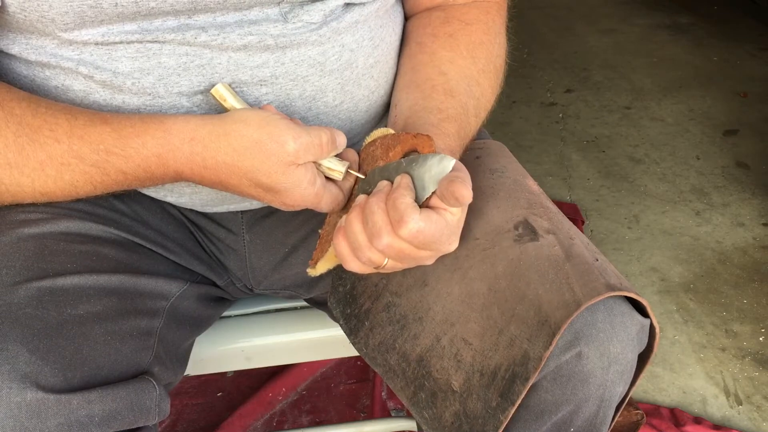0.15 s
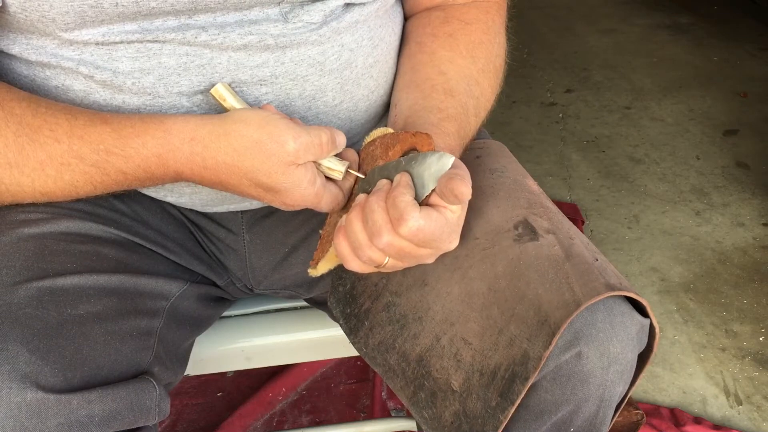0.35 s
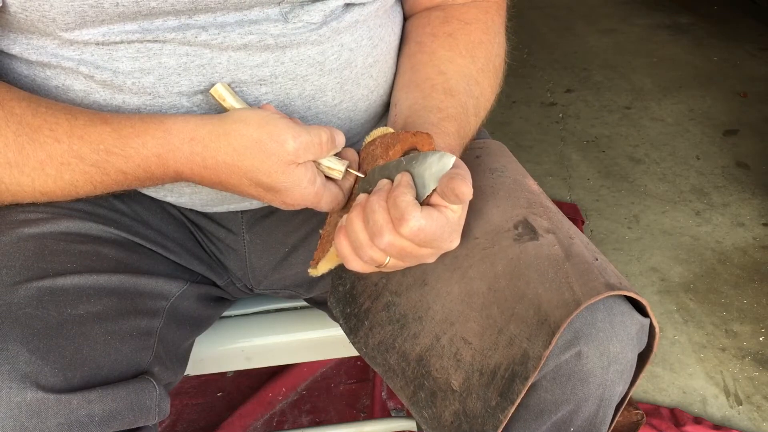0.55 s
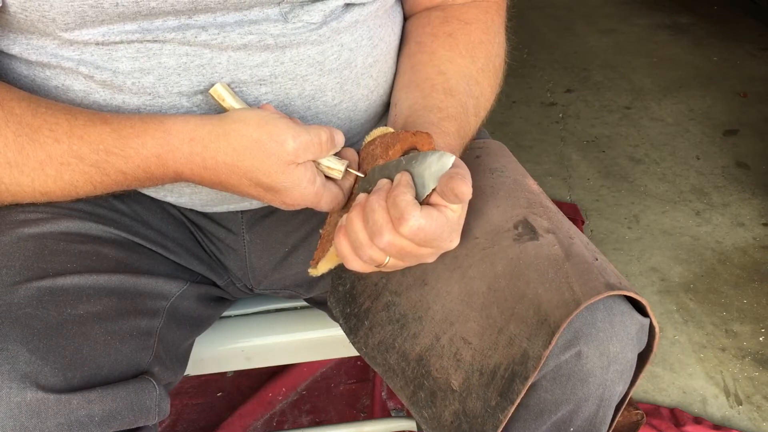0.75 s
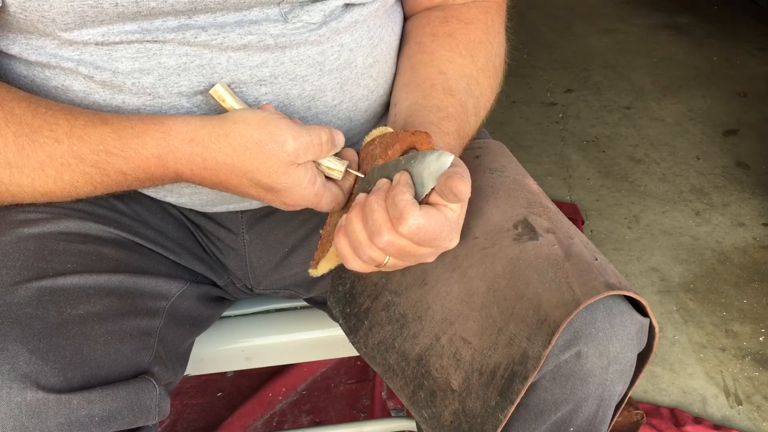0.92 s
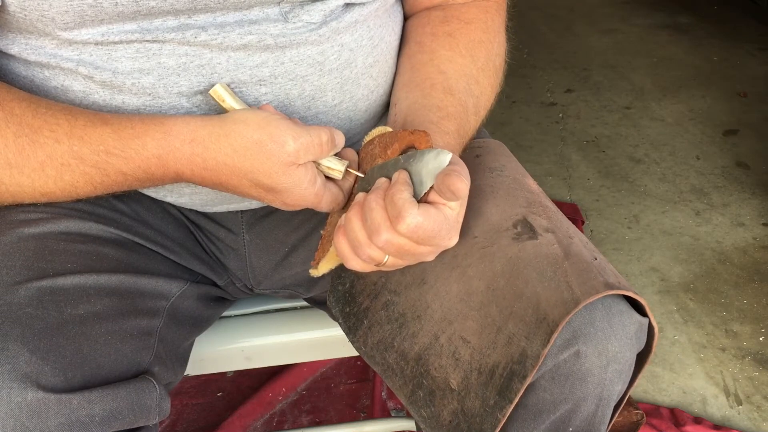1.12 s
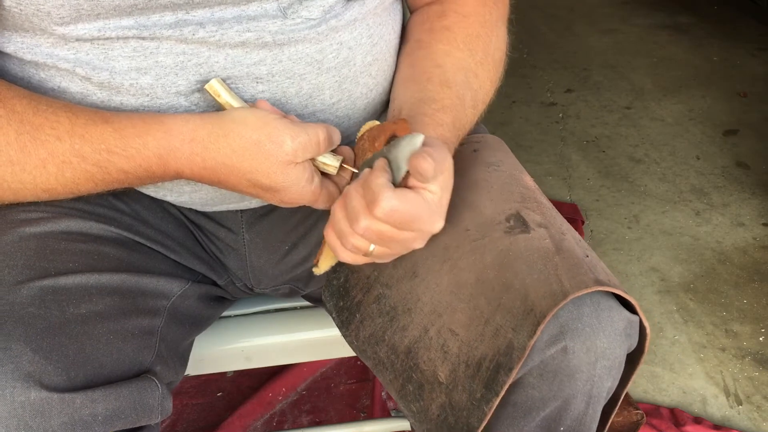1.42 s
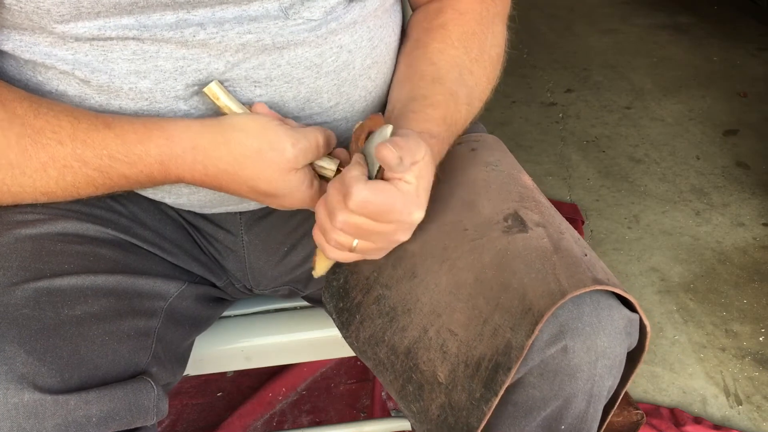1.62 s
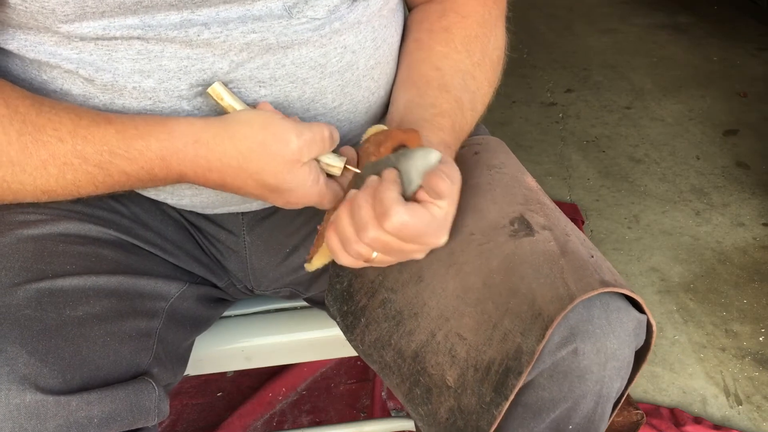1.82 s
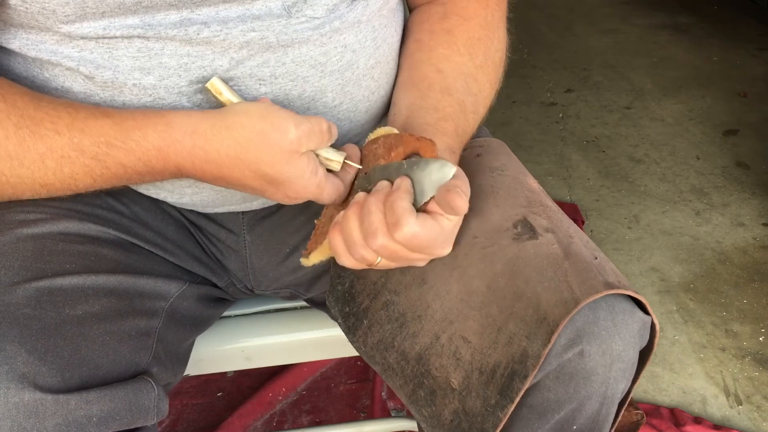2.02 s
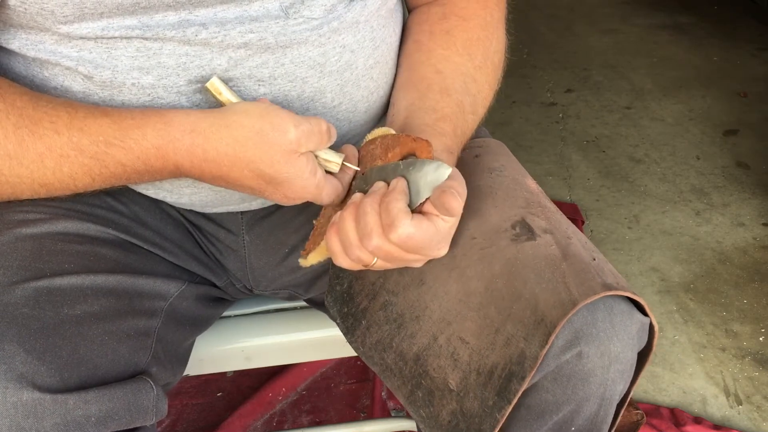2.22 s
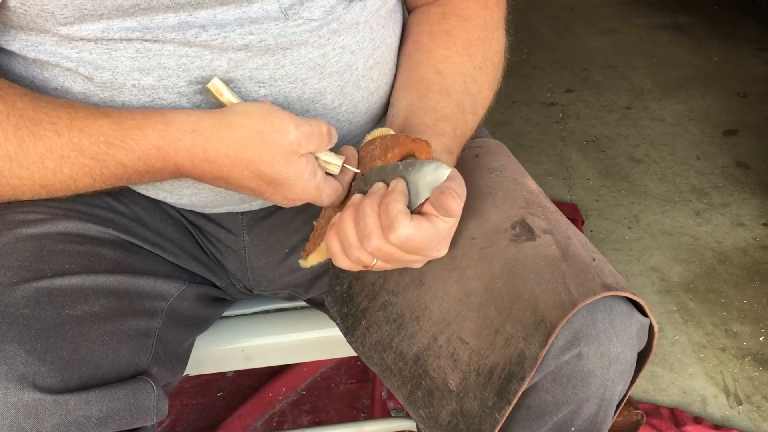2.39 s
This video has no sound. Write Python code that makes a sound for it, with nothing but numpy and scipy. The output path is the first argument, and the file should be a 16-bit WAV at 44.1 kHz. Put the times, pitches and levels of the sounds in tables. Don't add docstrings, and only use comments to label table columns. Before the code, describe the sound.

Close-up stone flaking on a leather pad, starting with small sparse clicks, building to loud snaps and a quick crackling cluster, then only soft room air and a faint low motor hum remain, mono.

```python
import sys
import numpy as np
from scipy import signal
from scipy.fft import rfft, irfft, next_fast_len
from scipy.io import wavfile
from scipy.ndimage import uniform_filter1d, map_coordinates

SR = 44100
rng = np.random.default_rng(int(sys.argv[2]) if len(sys.argv) > 2 else 0)


def transcribe(u):
    v = np.clip(np.atleast_2d(u).T, -1, 1)
    q = np.round(v * 32767).astype(np.int16)
    wavfile.write(sys.argv[1], SR, q)


def gain_from_decibels(decibels):
    exponent = np.asarray(decibels, float) / 20
    return 10 ** exponent


N = 112455


def unit(x):
    return x / np.sqrt(np.mean(x ** 2) + 1e-20)


def along(points, hz):
    f, v = np.transpose(points)
    return np.interp(np.log(hz + 1), np.log(f + 1), v)


def wobble(rate):
    knots = rng.standard_normal(400)
    return map_coordinates(knots, [np.arange(N) * rate / SR])


def filtered(x, response):
    m = next_fast_len(2 * len(x))
    hz = np.fft.rfftfreq(m, 1 / SR)
    return irfft(rfft(x, m) * response(hz), m)[:len(x)]


def add(track, x, s):
    track[round(s * SR):][:len(x)] += x


# f/Hz, density/dB per Hz
RUMBLE = [(20, -13), (35, -6), (70, 4.5), (150, -3), (220, -2.5), (320, -28.5), (600, -76)]
# f/Hz, density/dB per Hz
AIR = [(150, -16), (260, 2.5), (400, 1.5), (1100, -1), (2200, -10), (4840, -21.5), (10200, -31),
       (15300, -33.5)]


def air():
    def noise(points):
        response = lambda f: gain_from_decibels(along(points, f)) * (f < 15750)
        return unit(filtered(rng.standard_normal(N), response))

    rumble_db = -49 + 0.77 * wobble(7.0)
    wash_db = -52 + 0.18 * wobble(0.39) + 0.26 * wobble(10.9)
    return gain_from_decibels(rumble_db) * noise(RUMBLE) + gain_from_decibels(wash_db) * noise(AIR)


# t/s, f/Hz
IDLE = [(0, 73.87), (.5, 72.54), (.9, 74.3), (1.3, 73.78), (1.701, 74.88), (2.1, 73.8), (2.55, 72.96)]
# multiple of the slow beat, level/dB
ORDER = [(7, -59), (8, -49), (11, -43), (13, -54), (14, -61.5), (16, -45.5), (17, -51.5), (19, -58.5),
         (21, -51.5), (30, -59), (31, -64), (32, -55), (38, -62.5), (47, -68)]


def engine():
    def tone(phase, db):
        level = np.sqrt(2) * gain_from_decibels(db + 3.5 * wobble(3))
        drift = 0.22 * wobble(2.19)
        return level * np.sin(phase + 2 * np.pi * rng.random() + drift)

    s, hz = np.transpose(IDLE)
    t = np.arange(N) / SR
    firing_hz = np.interp(t, s, hz)
    beat = 2 * np.pi * np.cumsum(firing_hz) / SR / 16
    orders = sum(tone(round(k) * beat, db) for k, db in ORDER)
    fan = tone(2 * np.pi * 124.7 * t, -53.5)
    return orders + fan


# f/Hz, t60/s
ROOM = [(300, 0.42), (2000, 0.39), (6000, 0.25), (10000, 0.22), (15000, 0.14)]


def room(x):
    gap_s, tail_db = 0.0035, -16.5
    hz, t, z = signal.stft(rng.standard_normal(SR // 4), SR, nperseg=128)
    decay = gain_from_decibels(-60 * t / along(ROOM, hz)[:, None])
    tail = signal.istft(z * decay, SR, nperseg=128)[1]
    late = np.pad(tail / np.linalg.norm(tail), (round(gap_s * SR), 0))
    direct = np.pad(x, (0, len(late) - 1))
    return direct + gain_from_decibels(tail_db) * signal.fftconvolve(x, late)


def body(modes, scatter_db):
    def response(f):
        total = 0
        for k, ((centre, width, db), extra_db) in enumerate(zip(modes, scatter_db)):
            damping = 1j * f * width
            mode = damping / (centre ** 2 - f ** 2 + damping)
            total = total + (-1) ** k * gain_from_decibels(db + extra_db) * mode
        return total
    return response


def fractures(size, spread_db):
    return rng.standard_normal(size) * gain_from_decibels(spread_db * rng.exponential(size=size))


# f/Hz, width/Hz, level/dB
STONE = [(4550, 300, -6.5), (5450, 500, -7), (6220, 460, -2)]
# f/Hz, width/Hz, level/dB
PAD = [(1130, 350, -5), (1640, 260, -1), (2300, 360, -1), (3270, 200, -2)]
# f/Hz, width/Hz, level/dB
EDGE = [(7900, 600, -11.5), (9100, 600, -3), (9920, 400, -5.5), (11000, 570, -1.5), (12800, 700, -8.5),
        (13700, 600, -8.5), (15200, 1400, -6)]


def struck(force, pad_db, edge_db):
    soften_hz = 11800
    soft = filtered(force, lambda f: 1 / (1 + 1j * f / soften_hz) ** 3)
    scatter_db = 1.8 * rng.standard_normal((3, 7))
    parts = zip((STONE, PAD, EDGE), (0, pad_db, edge_db), scatter_db)
    return sum(gain_from_decibels(db) * unit(filtered(soft, body(modes, scatter))) for modes, db, scatter in parts)


GRIT_STARTS = [1.127, 1.381, 1.565, 1.612, 1.730, 1.761, 1.790, 1.824, 1.849]
# fade/ms, level/dB, pad share/dB, edge share/dB
GRIT = [
    (13, -54, 4.5, -7),
    (30, -41, 0.5, -11.5),
    (19, -42, 7.5, -5),
    (15, -57, 5.5, -7),
    (15, -52, 8, -9),
    (12, -48, -7, -5),
    (9.7, -41, -0.5, -8),
    (19, -43.5, 1, -9),
    (15.1, -47.5, 1, -9.5),
]


def grit():
    out, t = np.zeros(N + SR), np.arange(SR // 8) / SR
    grains_per_s = 5500
    for s, (ms, db, pad_db, edge_db) in zip(GRIT_STARTS, GRIT):
        hits = rng.random(len(t)) < grains_per_s / SR
        grains = fractures(len(t), 1.8) * hits
        fade = np.clip(t / 0.002, 0, 1) * np.exp(-(1000 * t / ms) ** 1.5)
        add(out, room(gain_from_decibels(db) * fade * struck(grains, pad_db, edge_db)), s)
    return out[:N]


# f/Hz, width/Hz, level/dB
HAND = [(408.3, 270, 6), (1043, 320, -3.5), (1702, 230, -1)]
# t/s, peak level/dB, finger share/dB, pad ring share/dB
THUMPS = [
    (1.3772, -27, -2, -15),
    (1.5612, -21.5, 0.5, -4.5),
]


def thumps():
    out, t = np.zeros(N + SR), np.arange(SR // 20) / SR
    push = np.exp(-((t - 0.0008) / 0.00015) ** 2)
    for s, db, finger_db, pad_ring_db in THUMPS:
        jolt = filtered(push, body(HAND, [0, finger_db, pad_ring_db]))
        add(out, room(gain_from_decibels(db) * jolt / np.abs(jolt).max()), s)
    return out[:N]


def evened(force):
    m = next_fast_len(2 * len(force))
    z = rfft(force, m)
    power = uniform_filter1d(np.abs(z) ** 2, round(450 * m / SR))
    cepstrum = irfft(-np.log(np.abs(power) + 1e-9) / 2, m)
    cepstrum[1:m // 2] *= 2
    cepstrum[m // 2 + 1:] = 0
    return irfft(z * np.exp(rfft(cepstrum)), m)[:len(force)]


def fracture_run(t, ms):
    u = 1000 * t / ms
    rise = 0.25
    shape = np.clip(u / rise, 0, 1) * np.exp(-5 * np.clip(u - rise, 0, None) ** 2)
    packed = np.sqrt(t[-1] / (ms / 1000 + 0.0015))
    return evened(shape * fractures(len(t), 1.5)), packed


BREAKS_DB = -19.5

# t/s, stone level/dB, pad share/dB, edge share/dB, run/ms
PRESS = [(0.0233, -65.5, 4, -6, 3), (0.5247, -59.5, -12, -2.5, 1.4), (0.9264, -61.5, 5.5, -15, 4.7),
         (0.9333, -52, -6, -7, 3), (0.9404, -58, -6, -2, 1.4), (0.9514, -55, -13, -4, 3.1),
         (1.0354, -80, -8, 6, 1.47), (1.0664, -79, -13, 6, 1.5), (1.1304, -50, -2, -5, 2),
         (1.3264, -54, -11, -5, 3), (1.3388, -51.5, -2, 2.5, 1.9), (1.3497, -44.5, -4, -7, 2),
         (1.3914, -45, 6, -10, 3.6), (1.4364, -56, -7.5, -1.5, 2.08)]
# t/s, stone level/dB, pad share/dB, edge share/dB, run/ms
SLIDE = [(1.5404, -55, 8, 5.5, 6), (1.6092, -44, -3, -6.5, 2.4), (1.7012, -52, -5, -11, 2.6),
         (1.7098, -48, 1, -6, 2.5), (1.7394, -54, -2, -20, 1.6), (1.7576, -42.5, 0, -6, 4.9),
         (1.7686, -42, -2, -4, 3.15), (1.779, -46, 4, -7, 1.7), (1.7848, -49, 4, -2, 1.4),
         (1.7925, -54, 2, -3, 2), (1.7984, -48, 5, -15.5, 3), (1.8467, -40.5, -2, -6.5, 6.9)]


def cracks():
    out, t = np.zeros(N + SR), np.arange(SR // 20) / SR
    for s, db, pad_db, edge_db, ms in list(PRESS) + list(SLIDE):
        force, packed = fracture_run(t, ms)
        ring = struck(force, pad_db, edge_db)
        add(out, room(gain_from_decibels(db + BREAKS_DB) * packed * ring), s)
    return out[:N]


# f/Hz, width/Hz, level/dB
FLAKE_A = [(1050, 300, -7), (1580, 230, -6), (2330, 220, -4), (3320, 220, -3), (4540, 230, -6.5),
           (5230, 280, 0.5), (6190, 350, -1.5), (7350, 340, -9), (7950, 240, -11), (8700, 360, -9),
           (10600, 500, -9.5), (13400, 600, -25), (15600, 900, -25)]
FLAKE_B = [(1080, 334, -4), (2190, 510, -2), (3260, 220, -4.5), (4400, 290, -7.5), (5730, 220, 0.5),
           (6300, 430, -0.5), (7840, 340, -13.5), (8930, 310, -9.5), (9990, 340, -10), (11100, 372, -7),
           (12810, 210, -26), (13670, 250, -18.5), (14600, 460, -26), (15550, 220, -25.5)]
FLAKE_C = [(1090, 680, -7.5), (2800, 600, -7), (5830, 730, -0.5), (7110, 430, -3), (7810, 300, -1.5),
           (8970, 300, -7.5), (9700, 300, -4.5), (10670, 490, -2), (12900, 500, -13), (13500, 400, -12.5),
           (14700, 500, -15), (15600, 600, -13.5)]
FLAKE_D = [(1350, 320, -2.5), (2210, 310, -4), (3300, 500, -10), (4780, 500, -2.5), (5600, 440, -1),
           (7730, 270, -12), (8890, 280, -16), (11100, 540, -20), (13600, 500, -27), (15600, 900, -22)]
FLAKE_E = [(2390, 410, -0.5), (3300, 260, -3.5), (4660, 360, -0.5), (6220, 240, -1), (7400, 400, -9),
           (8900, 310, -5), (10100, 340, -11), (11000, 290, -13), (12500, 290, -18), (13800, 300, -15)]
FLAKE_F = [(1010, 300, -10), (1680, 170, -1), (2310, 320, -6.5), (2870, 300, -6.5), (3210, 220, -4),
           (4613, 240, -5.5), (5500, 460, -7), (6110, 320, 1)]
# t/s, level/dB, run/ms, which flake (0 = A)
SNAPS = [
    (1.123, -30.5, 4.3, 0),
    (1.3779, -20, 2.1, 1),
    (1.5599, -23.5, 1.56, 2),
    (1.5604, -16.5, 3.17, 5),
    (1.7266, -32.5, 3.7, 3),
    (1.7868, -27.5, 3.4, 4),
]


def snaps():
    out, t = np.zeros(N + SR), np.arange(SR // 20) / SR
    flakes = (FLAKE_A, FLAKE_B, FLAKE_C, FLAKE_D, FLAKE_E, FLAKE_F)
    for s, db, ms, which in SNAPS:
        modes = flakes[round(which)]
        force, packed = fracture_run(t, ms)
        ring = unit(filtered(force, body(modes, np.zeros(len(modes)))))
        add(out, room(gain_from_decibels(db + BREAKS_DB) * packed * ring), s)
    return out[:N]


def scene():
    return (air() + engine() + grit() + thumps() + cracks() + snaps())[None]


def low_pass(x):
    return signal.sosfilt(signal.butter(12, 16840, fs=SR, output="sos"), x)


def record(dry):
    top_hz, slope_db_per_khz = 15900, 45
    roll_off = lambda f: gain_from_decibels(-slope_db_per_khz * np.clip(f - top_hz, 0, None) / 1000)
    mix = filtered(dry[0], roll_off)[None]
    return low_pass(mix)


dry = scene()
out = record(dry)
transcribe(out)
```